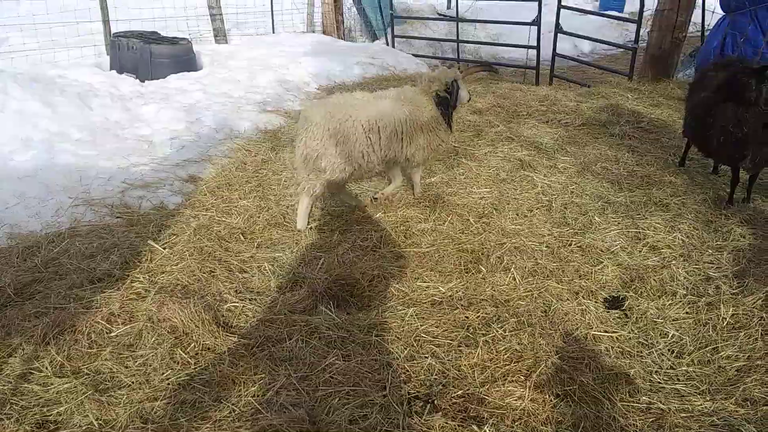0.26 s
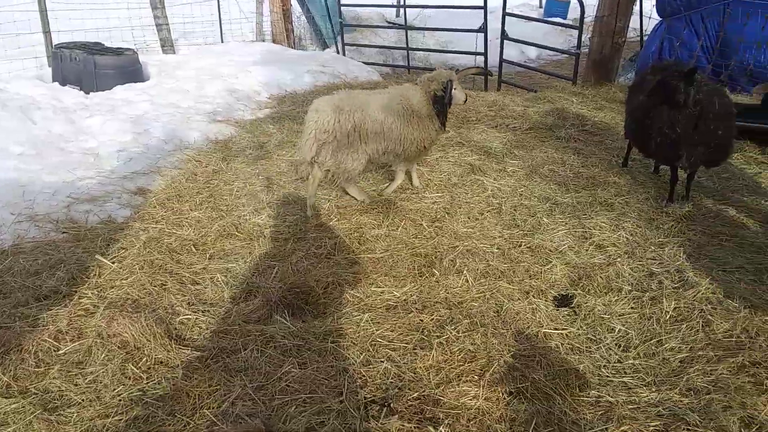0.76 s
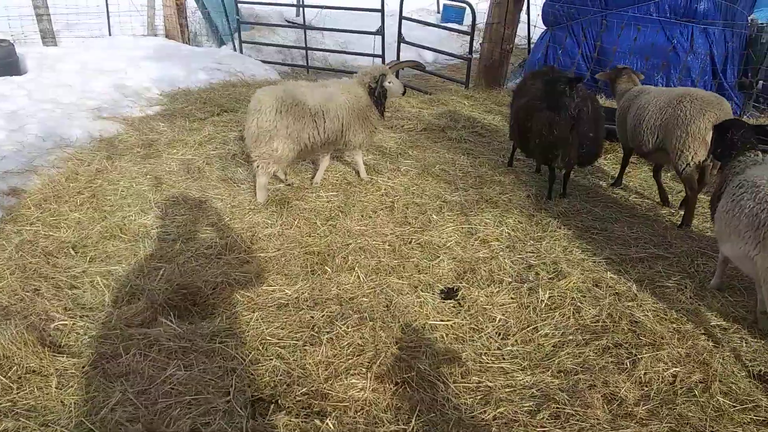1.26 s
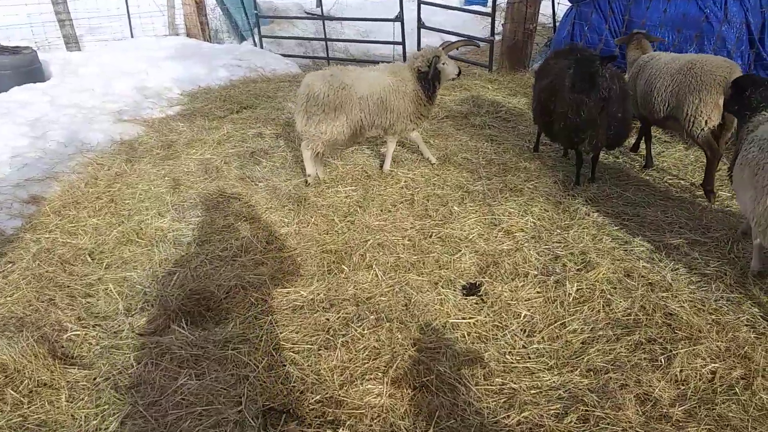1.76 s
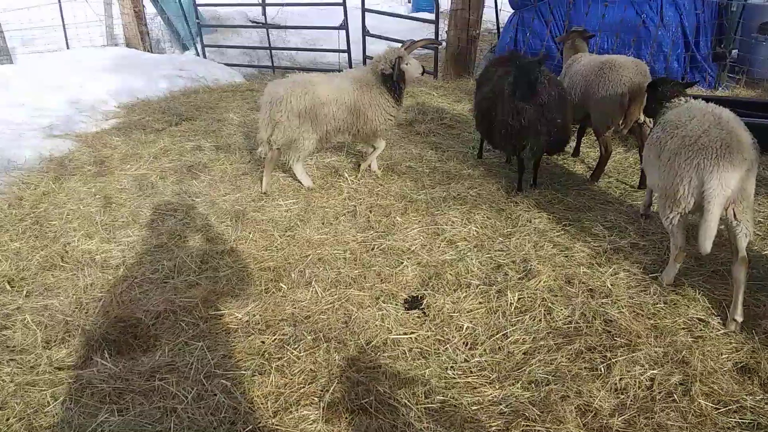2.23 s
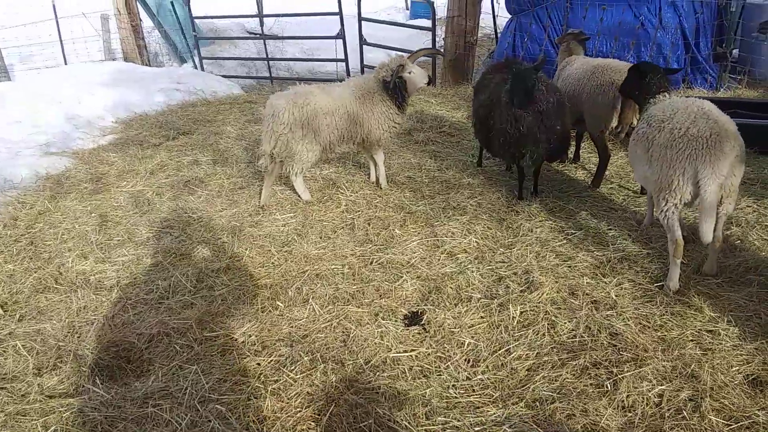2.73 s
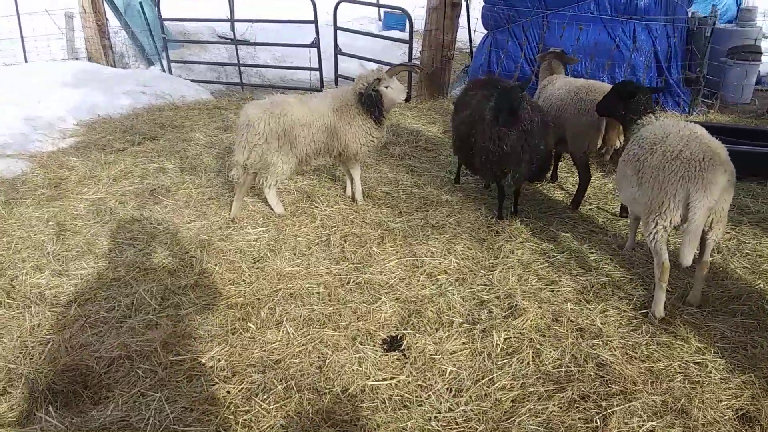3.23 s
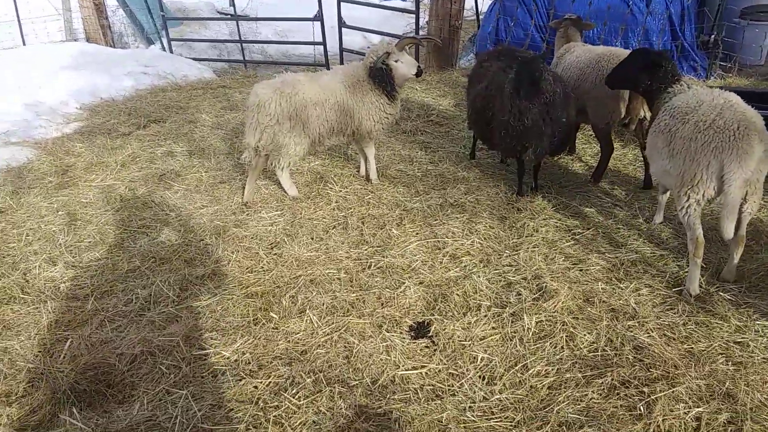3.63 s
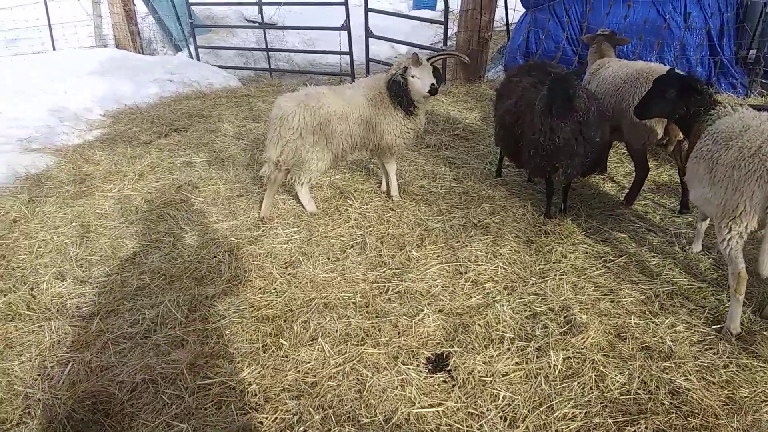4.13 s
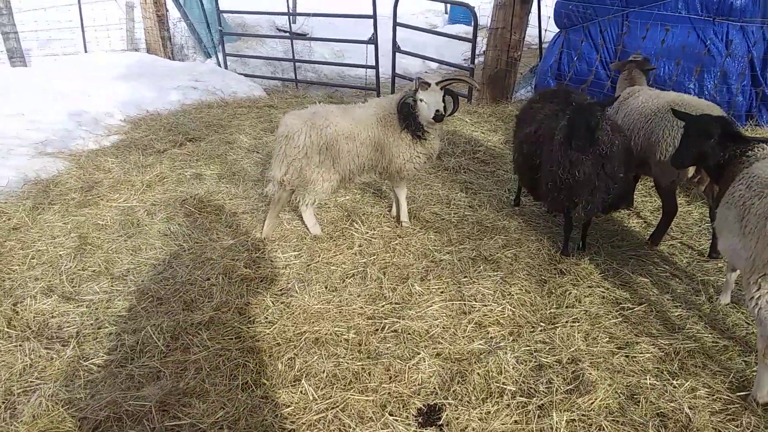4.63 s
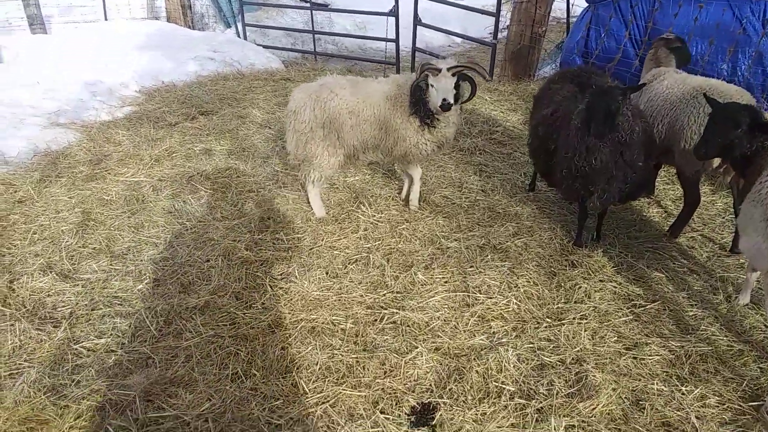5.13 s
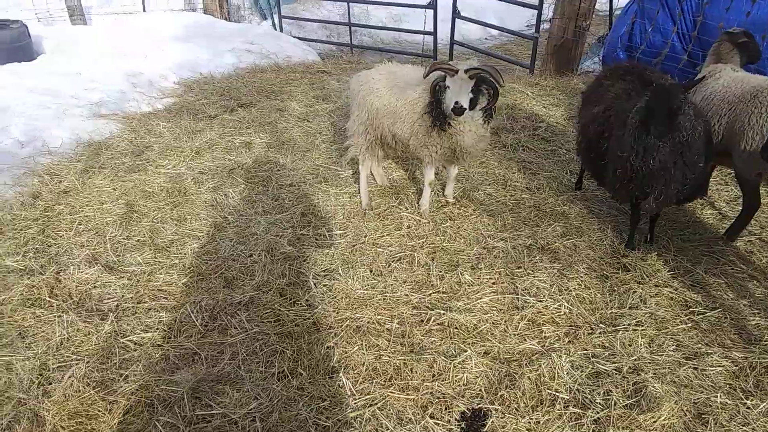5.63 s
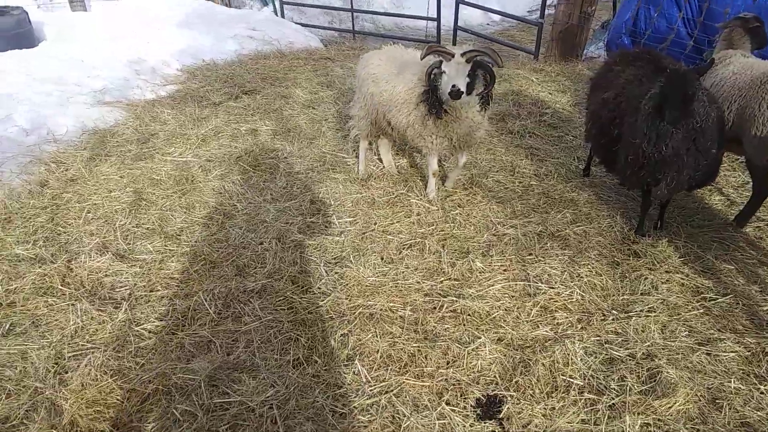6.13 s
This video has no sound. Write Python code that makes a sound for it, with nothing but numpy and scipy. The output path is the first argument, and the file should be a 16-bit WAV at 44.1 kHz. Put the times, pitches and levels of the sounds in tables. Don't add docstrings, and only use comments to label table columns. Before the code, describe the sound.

Sheep shift about on dry straw beside a wall. A clipped bleat ends at once, followed by dull wind buffets, crisp stalk ticks and two quiet, slow, clicking throat grunts. Later comes the main call, a low-pitched, nasal, fluttering bleat of about eight tenths of a second, with a short close outdoor reflection. Afterwards small crunches, wind bumps and quiet air continue to the end.

```python
import sys
import numpy as np
from scipy import signal
from scipy.fft import rfft, irfft, next_fast_len
from scipy.io import wavfile
from scipy.ndimage import uniform_filter1d

SR = 44100
rng = np.random.default_rng(int(sys.argv[2]) if len(sys.argv) > 2 else 0)


def nominal_scale(level):
    x = np.asarray(level, float) / 20
    return 10 ** x


def transcribe(u):
    v = np.clip(np.atleast_2d(u).T, -1, 1)
    q = np.round(v * 32767).astype(np.int16)
    wavfile.write(sys.argv[1], SR, q)


N = 280917

# t/s, level/dB
GUST = [(0, -58), (.25, -67.5), (.5, -53.5), (.9, -52), (1.15, -68), (1.4, -63.5), (1.68, -52.5),
        (1.98, -73), (2.3, -66), (3.0, -63), (3.25, -54.5), (3.58, -63.5), (4.3, -59.5), (4.62, -56),
        (5.0, -74.5), (5.6, -69.5), (6.05, -58.5), (6.37, -65)]
# delay/s, level/dB
GROUND_BOUNCES = [
    (.0028, -11),
    (.0068, -11),
]


def bleats():
    # centre t/s, effort level/dB, half width/s, pitch f/Hz, brightness/dB
    throbs = [
        [(-.003, -21, 0.018, 125.9, -5.5), (.028, -36, .012, 137.2, -13.5), (.078, -31, 0.026, 141.1, 0.5),
         (.109, -40.5, 0.0066, 138.2, -14), (.125, -59, 0.0092, 137.7, 4)],
        [(3.805, -41.5, 0.0105, 135.2, -7.5), (3.826, -33, 0.02, 142.4, -9), (3.901, -33, 0.015, 150.1, -4),
         (3.968, -31, 0.022, 153.1, -7), (4.049, -32, 0.022, 149.7, -5.5), (4.121, -31.5, .02, 153.2, -5.5),
         (4.194, -30.5, .022, 151.9, -5.5), (4.279, -31.5, 0.025, 156.2, -3.5), (4.36, -30.5, 0.021, 152.4, -7),
         (4.449, -31.5, 0.019, 152.6, -5.5), (4.539, -34.5, 0.023, 146.4, -7), (4.585, -52, 0.025, 140, -14.5)],
    ]
    # t/s, first f/Hz, second f/Hz, third f/Hz
    mouths = [
        [(0, 625, 1680, 2500), (.05, 610, 1660, 2430), (.1, 600, 1690, 2430), (.125, 630, 1660, 2620)],
        [(3.795, 520, 1480, 1980), (3.835, 545, 1620, 2330), (3.89, 600, 1670, 2560), (3.97, 650, 1710, 2530),
         (4.07, 675, 1640, 2580), (4.3, 685, 1600, 2560), (4.6, 670, 1590, 2530)],
    ]
    # width/Hz, level/dB
    throats = [
        [(75, 7.5), (140, -5.5), (200, -8)],
        [(150, 2.5), (160, 0), (230, -3)],
    ]
    # f/Hz, width/Hz, level/dB
    skulls = [
        [(300, 200, -28), (450, 150, -26), (1000, 200, -22), (2150, 200, -22), (2920, 240, -10),
         (3600, 260, -20), (4500, 900, -36)],
        [(320, 280, -17), (445, 120, -13), (790, 120, -11), (1000, 120, -23), (2150, 300, -20),
         (3050, 450, -13), (3650, 450, -19), (4200, 500, -25), (5600, 2200, -40)],
    ]
    rasps = [.03, .14]
    # first t/s, last t/s
    on_beat = [
        (.0008, .0762),
        (3.9605, 4.449),
    ]
    wet_db = [-1, 4]
    out = np.zeros(N)
    for *call, wet in zip(throbs, mouths, throats, skulls, rasps, on_beat, wet_db):
        voice, start = bleat(*call)
        placed = np.zeros(N)
        add(placed, start, voice)
        out += nominal_scale(-3.0) * yard(placed, GROUND_BOUNCES[0], wet)
    return out


def bleat(throbs, mouth, throat, skull, rasp, on_beat):
    between_db, hollow_db = -8, -7
    linger, dull_span = 1.35, .8
    chest_db = -9.5
    s, effort_db, width, pitch_hz, bright_db = np.transpose(throbs)
    t = np.arange(max(s[0] - .06, -.0066), s[-1] + .08, 1 / SR)

    def swell(late, rise=1, fall=1):
        since = t[:, None] - late - s
        span = .55 * width * np.where(since < 0, rise, fall)
        return (nominal_scale(effort_db) * np.exp(-.5 * (since / span) ** 2)).sum(1)

    inside = np.clip(np.minimum(t - s[0], s[-1] - t) / 0.02, 0, 1)
    leak = nominal_scale(np.interp(t, s, effort_db) + between_db) * inside
    slack = leak / (leak + swell(0) + 1e-9)
    wobble = evened(uniform_filter1d(rng.standard_normal(len(t)), 300))
    hz = np.interp(t, s, pitch_hz) * (1.02 - .12 * slack + rasp * (.1 + .25 * slack) * wobble)

    turns = np.cumsum(hz) / SR
    first, last = np.interp(on_beat, t, turns)
    turns = (turns - first) * round(last - first) / (last - first)
    closures = np.diff(np.floor(turns), prepend=np.floor(turns[0]))
    beats = evened(closures * nominal_scale(9 * rasp * rng.standard_normal(len(t))))
    breath = evened((.15 + np.exp(-(turns % 1) / .35)) * rng.standard_normal(len(t)))
    share = rasp * (1 + 1.3 * slack)

    def drive(mix):
        mix = np.clip(mix, 0, 1)
        return (1 - mix) * beats + mix * breath

    dull = drive(share) * (swell(-0.0028, dull_span, dull_span) + nominal_scale(hollow_db) * leak)
    sharp = drive(2.1 * share) * (swell(0.0026, 1, linger) + leak)
    sharp *= nominal_scale(np.interp(t, s, bright_db))

    at, *centres = np.transpose(mouth)
    jaw = 1 + 0.088 * (slack - slack.mean())
    moving = [(jaw * np.interp(t, at, c), *shape) for c, shape in zip(centres, throat)]
    stretch = moving[2][0] / moving[2][0].mean()
    gape = moving[0][0] / moving[0][0].max()
    riding = []
    for f, w, db in skull:
        ride = stretch if f > 2900 else gape if 700 < f < 900 else 1
        riding.append((f * ride, w, db))

    voice = formant(beats * swell(0) * gape ** 3, hz, 79, chest_db)
    ordered = sorted(moving + riding, key=lambda row: np.mean(row[0]))
    for k, (f, w, db) in enumerate(ordered):
        centre = np.mean(f)
        source = dull if centre < 1200 else sharp if centre < 4000 else sharp * (1 - slack)
        voice += (-1) ** k * formant(source, f, w, db)
    voice /= np.std(formant(drive(share), *moving[0]))
    return voice[t >= 0], max(t[0], 0)


def grunts():
    # start t/s, first gap/s, quickening per flap/s
    paces = [
        (0.5336, .0257, 0.00027),
        (2.5373, .0258, .0016),
    ]
    counts = (6, 10)
    # peak level/dB, loudest flap, fall one flap away/dB, steepening exponent
    arches = [
        (-30, 2.1, 1, 2.25),
        (-37, 1.6, 3, 0.52),
    ]
    # f/Hz, level/dB, t60/s
    throat_modes = [
        [(210, -1.5, 0.051), (480, 1.5, 0.012), (1470, -3.5, 0.046), (2990, 9, 0.0091), (3190, -8, .03),
         (3420, -9, 0.025), (3920, -9, 0.021)],
        [(210, 0, 0.079), (310, -0.5, 0.041), (480, -3, 0.039), (1500, -9, 0.039), (2420, 6, 0.012),
         (2930, 1, 0.026), (3430, 8.5, 0.0087), (3770, 2, 0.017)],
    ]
    out = np.zeros(N)
    for pace, count, arch, modes in zip(paces, counts, arches, throat_modes):
        out += grunt(flapping(pace, count, arch), modes)
    return yard(out, GROUND_BOUNCES[1], -5)


def flapping(pace, count, arch):
    start, gap, quicken = pace
    peak_db, top, fall_db, steep = arch
    k = np.arange(count)
    times = start + gap * k - quicken * k * k / 2
    return zip(times, peak_db - fall_db * abs(k - top) ** steep)


def grunt(flaps, modes):
    dulling_db = 0.6
    spread_db, detune = 1.3, .008
    rise_s, open_s = 0.0014, 0.01
    out, t = np.zeros(N), np.arange(2500) / SR
    gate = np.sin(np.pi / 2 * np.minimum(t / rise_s, 1)) ** 2 / (1 + (t / open_s) ** 4)
    for k, (s, peak_db) in enumerate(flaps):
        ring = np.zeros(len(t))
        chance = rng.standard_normal((len(modes), 2))
        for (hz, db, t60), (louder, sharper) in zip(modes, chance):
            level_db = db - k * dulling_db * (hz > 2000) + spread_db * louder - 60 * t / t60
            ring += nominal_scale(level_db) * np.sin(2 * np.pi * hz * (1 + detune * sharper) * t)
        add(out, s, nominal_scale(peak_db - 4.0) * ring * gate)
    return out


def straw():
    # f/Hz, density level/dB
    fizz_colour = [(2650, 0.5), (4500, -2), (5080, -7), (5910, -0.5), (7680, -1), (8220, -2), (13000, -10),
                   (15200, -5), (15800, 2.5)]
    # f/Hz, density level/dB
    crush_colour = [(180, 0), (300, 5.5), (417, 6.5), (465, -3.5), (678, 0.5), (766, -2.5), (1360, 2),
                    (3770, -5), (5500, -29.5), (7150, -70), (12100, -120)]
    # t/s, peak level/dB, f/Hz
    snaps = [(0.0254, -41, 5710), (0.192, -51, 5650), (1.0271, -55, 7580), (1.3169, -43, 6960),
             (1.8647, -51, 7530), (2.7726, -52, 5680), (2.9014, -43.5, 8500), (3.309, -54, 6860),
             (3.902, -37.5, 7550), (4.6514, -52, 6440), (4.6845, -51, 6270), (5.035, -56.5, 9580),
             (5.059, -43.5, 7200), (5.3542, -53, 7050), (5.4111, -57, 7070), (5.5872, -56, 7980),
             (5.662, -47, 6920), (5.9788, -57, 6700), (6.1407, -45, 6700), (6.2776, -57, 6270)]
    flicker = drift(0.0094)
    crush, fizz = stirring((-67, -71))
    out = fizz * nominal_scale(1.74 * flicker) * coloured(crackle(1500, 1.6, 0.93), fizz_colour)
    out += crush * nominal_scale(1.06 * flicker) * coloured(crackle(900, 3.5, 0.81), crush_colour)
    t = np.arange(200) / SR
    for s, peak_db, hz in snaps:
        tick = np.sin(2 * np.pi * hz * t) + 0.43 * rng.standard_normal(len(t))
        add(out, s, nominal_scale(peak_db + 1.0 - 60 * t / 0.0032) * tick)
    return out


def stirring(rest_db):
    # centre t/s, half
    # length/s, crush level/dB, fine stalks level/dB
    steps = [(0.018, 0.068, -48, -55), (0.216, 0.01, -76, -55), (0.318, 0.043, -71, -62),
             (0.486, 0.074, -60.5, -72), (0.643, 0.062, -56, -59.5), (0.774, 0.058, -63, -58.5),
             (0.883, 0.04, -65.5, -55.5), (1.056, 0.037, -65, -63), (1.195, 0.072, -60, -61.5),
             (1.358, 0.087, -68, -61.5), (1.45, 0.13, -60, -62.5), (1.67, 0.13, -64, -65.5),
             (1.918, 0.11, -70, -64.5), (2.288, 0.028, -82, -67.5), (2.59, 0.1, -59, -65),
             (2.89, 0.087, -58, -63.5), (3.047, 0.044, -60, -60.5), (3.294, 0.023, -67, -66),
             (3.46, 0.05, -59.5, -60.5), (3.626, 0.018, -61, -86), (3.806, 0.042, -69, -61.5),
             (4.21, 0.21, -47, -64), (4.56, 0.03, -52, -63.5), (4.738, 0.052, -74, -61),
             (5.03, 0.1, -60.5, -64), (5.152, .006, -56, -61), (5.166, 0.008, -52, -62),
             (5.177, .006, -57, -66), (5.19, .012, -55, -59), (5.225, 0.016, -55, -62),
             (5.249, .005, -48, -62), (5.266, 0.014, -54.5, -64), (5.304, 0.052, -59, -59),
             (5.675, 0.099, -67, -64.5), (5.916, 0.072, -62.5, -67), (6.125, 0.02, -52.5, -60),
             (6.142, 0.019, -55.5, -59.5)]
    rise = .8
    s, half, *levels_db = np.transpose(steps)
    t = np.arange(0, N / SR + .01, .002)
    late = (t[:, None] - s) / half + 1 - rise
    bump = np.exp(-(late / np.where(late < 0, rise, 2 - rise)) ** 2)
    gains = []
    for rest, db in zip(rest_db, levels_db):
        power = nominal_scale(2 * rest) + bump @ nominal_scale(2 * db)
        gains.append(np.interp(np.arange(N) / SR, t, np.sqrt(power)))
    return gains


def crackle(per_s, spread_db, mix):
    size = nominal_scale(spread_db * np.minimum(rng.exponential(1, N), 5)) * rng.choice([-1., 1.], N)
    clicks = evened(size * (rng.random(N) < per_s / SR))
    return evened(mix * clicks + rng.standard_normal(N))


def wind():
    # f/Hz, density level/dB
    rumble_colour = [(25, -44), (45, -14), (70, -2), (120, -7), (200, -9), (350, -17.5), (700, -57)]
    # centre t/s, rms level/dB, f/Hz, length/s
    puffs = [(0.401, -41.5, 145, 0.044), (0.465, -45.5, 135, 0.023), (0.59, -55, 198, 0.0049),
             (0.678, -38, 132, 0.017), (0.835, -33, 125, 0.01), (0.935, -37, 105, 0.02),
             (0.986, -42.5, 165, 0.012), (1.486, -36.5, 139, 0.0049), (1.594, -35.5, 125, 0.031),
             (1.682, -52, 133, 0.045), (1.928, -48, 120, 0.022), (2.122, -45.5, 107, 0.0097),
             (2.249, -44.5, 91, 0.011), (2.863, -44.5, 131, 0.015), (2.899, -43.5, 89, 0.021),
             (3.134, -42.5, 154, 0.0079), (3.164, -39, 127, 0.0068), (3.262, -40.5, 142.4, 0.024),
             (3.365, -37, 94.5, 0.005), (3.402, -41.5, 94, 0.031), (3.444, -30.5, 170.6, 0.02),
             (3.736, -43.5, 185, 0.011), (4.661, -40.5, 113, 0.011), (4.914, -43, 105.5, 0.011),
             (5.23, -47.5, 104, 0.019), (5.624, -48, 149, 0.014), (5.683, -34, 114, 0.0083),
             (6.026, -44, 95, 0.034), (6.183, -45.5, 164, 0.0099), (6.233, -48.5, 124, 0.01)]
    # centre t/s, rms level/dB, f/Hz, length/s
    knocks = [(0.609, -52, 302, 0.059), (0.641, -46, 189, 0.082), (0.836, -40, 290, 0.008),
              (1.62, -37.5, 185, 0.012), (1.62, -51, 480, 0.0051), (1.646, -42.5, 91, 0.021),
              (3.448, -33, 300, 0.0047), (3.45, -36.5, 84, 0.025), (3.494, -44, 100, 0.011),
              (3.572, -49, 420, 0.0074), (3.597, -48.5, 286, 0.0092), (4.29, -55, 78.7, 0.023),
              (4.55, -48, 210, 0.03), (4.591, -49.5, 106.6, 0.033), (.415, -45, 87, 0.03),
              (.51, -52, 111, 0.027), (.754, -47, 177, 0.019), (1.109, -51.5, 107, 0.013),
              (1.415, -49.5, 143, 0.017), (2.324, -52.5, 109, .012), (2.478, -50, 84, 0.018),
              (2.827, -48, 99, 0.0091), (3.19, -45.5, 85, 0.021), (3.635, -48.5, 149, 0.029),
              (5.495, -51, 120, 0.016), (5.903, -47, 112, 0.014), (5.979, -50.5, 82, 0.052),
              (6.088, -42, 95, 0.01), (6.33, -50, 119, 0.022)]
    under, under_db = .6, -10
    rumble = coloured(rng.standard_normal(N), rumble_colour)
    rumble /= np.sqrt(uniform_filter1d(rumble ** 2, 4000) + .05)
    out = nominal_scale(curve(GUST) + 2) * rumble
    for s, db, hz, length in list(puffs) + list(knocks) + eddies():
        t = np.arange(-2 * length, 3 * length, 1 / SR)
        phase, glide, bend = rng.uniform(-0.69, 1, 3)
        turns = 2 * np.pi * hz * t * (1 + (.1 * glide - .06) * t / length) + np.pi * phase
        shape = np.exp(-.5 * (t / (np.where(t < 0, .4, .55) * length)) ** 2)
        push = np.sin(turns) + nominal_scale(under_db) * np.sin(under * turns + 3 * glide)
        push += 0.18 * shape * np.sin(2.16 * turns + 3 * bend)
        add(out, s + t[0], nominal_scale(db + 2.5) * shape * push)
    return out


def eddies():
    count, level_db, spread_db = 50, 5, 3
    mid_hz, mid_s = 125, 0.029
    place, size, tone, span = rng.random((count, 4)).T
    s = (np.arange(count) + place) * (N / SR - .1) / count + .05
    db = np.interp(s, *np.transpose(GUST)) + level_db + spread_db * (2 * size - 1)
    return list(zip(s, db, mid_hz * 2 ** (tone - .5), mid_s * 2 ** (2 * span - 1)))


def drone():
    # t/s, level/dB
    passing = [(5.2, -86), (5.32, -63.5), (5.7, -65.5), (5.8, -83)]
    return nominal_scale(curve(passing)) * evened(formant(rng.standard_normal(N), 1230, 130, 0))


def still_air():
    # f/Hz, density level/dB
    air_colour = [(24, -42), (40, -14), (64, 0), (96, -10.5), (296, -12), (642, -9.5), (982, -15),
                  (1330, -15), (1430, -19.5), (1580, -17.5), (2240, -26.5), (3430, -27.5), (4990, -38.5),
                  (6240, -33), (15800, -40)]
    return nominal_scale(-57 + 1.3 * drift(0.057)) * coloured(rng.standard_normal(N), air_colour)


def yard(x, bounce, wet_db):
    # delay/s, level/dB
    wall = [
        (.013, -15),
        (.021, -17),
        (.034, -24),
    ]
    t60, tail_db = .15, -10
    t = np.arange(SR // 3) / SR
    tail = rng.standard_normal(len(t)) * nominal_scale(-60 * t / t60) * np.clip((t - .01) / 0.0037, 0, 1)
    tail = nominal_scale(tail_db) * tail / np.linalg.norm(tail)
    for delay, db in wall:
        tail[round(delay * SR)] += nominal_scale(db)
    tail *= nominal_scale(wet_db)
    tail[round(bounce[0] * SR)] += nominal_scale(bounce[1])
    tail = signal.lfilter(*signal.butter(2, [250, 4500], "band", fs=SR), tail)
    return x + signal.oaconvolve(x, tail)[:N]


def formant(x, hz, width, db):
    return nominal_scale(db) * resonate(resonate(x, hz, width), hz, 3.0 * width)


def resonate(x, hz, width):
    turn = np.exp(2j * np.pi * np.cumsum(hz * np.ones(len(x))) / SR)
    r = np.exp(-np.pi * width / SR)
    return 2 * (turn * signal.lfilter([1 - r], [1, -r], x / turn + 1e-18)).real


def coloured(x, points):
    size = next_fast_len(len(x))
    gain = nominal_scale(read(points, np.fft.rfftfreq(size, 1 / SR)))
    return evened(irfft(rfft(x, size) * gain, size)[:len(x)])


def read(points, hz):
    f, value = np.transpose(points)
    return np.interp(np.log(hz + 1), np.log(f + 1), value)


def curve(rows):
    s, value = np.transpose(rows)
    return np.interp(np.arange(N) / SR, s, value)


def drift(seconds):
    size = max(round(seconds * SR), 1)
    return evened(uniform_filter1d(uniform_filter1d(rng.standard_normal(N), size), size))


def evened(x):
    return x / np.sqrt(np.mean(x ** 2) + 1e-20)


def add(mix, s, sound):
    part = mix[max(round(s * SR), 0):][:len(sound)]
    part += sound[:len(part)]


def scene():
    return (bleats() + grunts() + straw() + wind() + drone() + still_air())[None]


def low_pass(x):
    return signal.sosfilt(signal.butter(12, 17060, fs=SR, output="sos"), x)


def record(dry):
    cut = signal.sosfilt(signal.butter(3, 48, "high", fs=SR, output="sos"), dry)
    lowpass = signal.firwin(1023, 15850, window=("kaiser", 9), fs=SR)
    cut = signal.oaconvolve(cut, lowpass[None], "same")
    return low_pass(cut)


dry = scene()
out = record(dry)
transcribe(out)
```